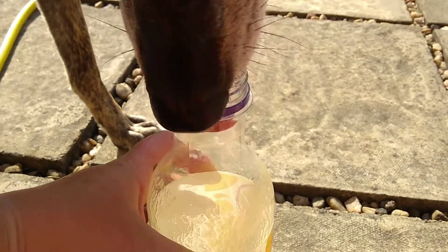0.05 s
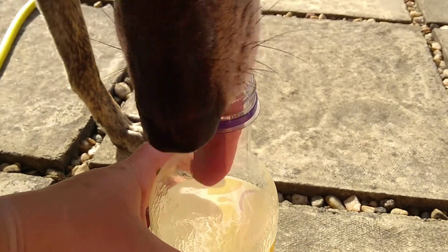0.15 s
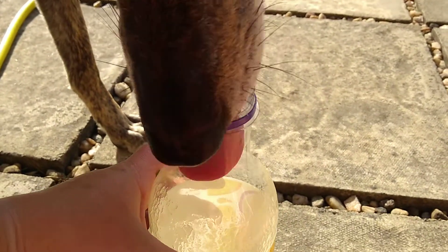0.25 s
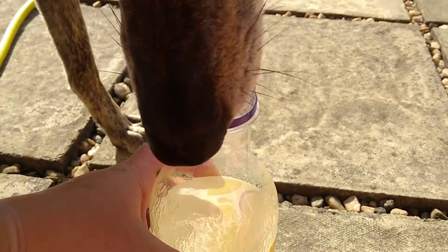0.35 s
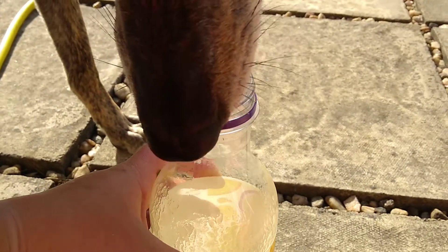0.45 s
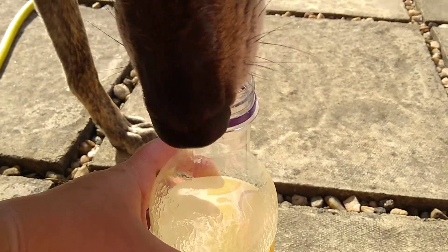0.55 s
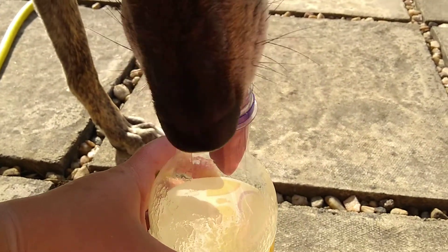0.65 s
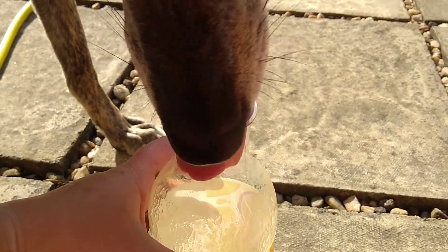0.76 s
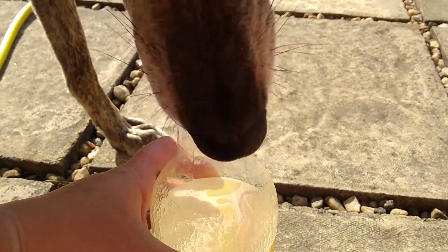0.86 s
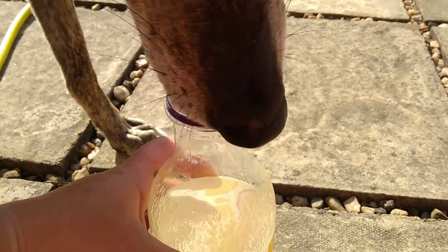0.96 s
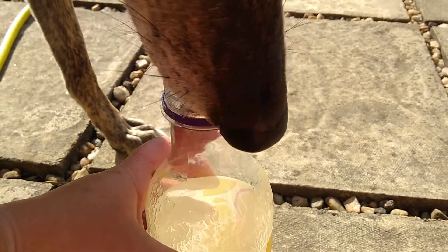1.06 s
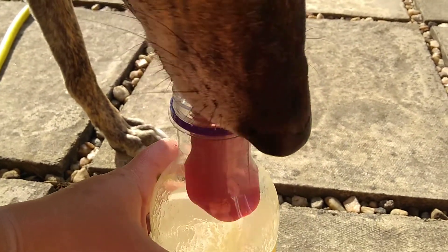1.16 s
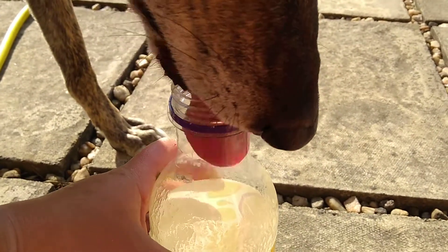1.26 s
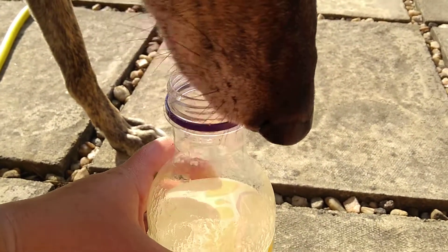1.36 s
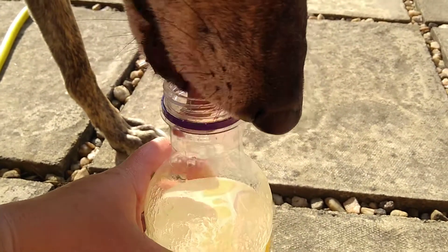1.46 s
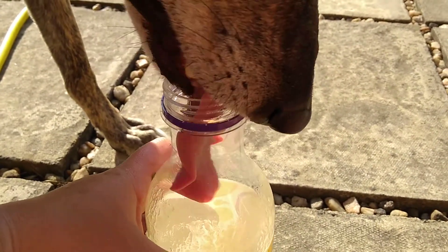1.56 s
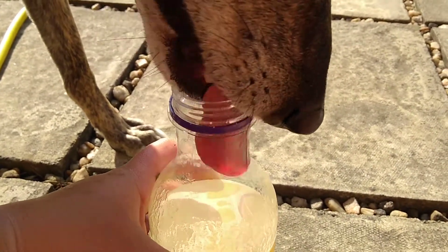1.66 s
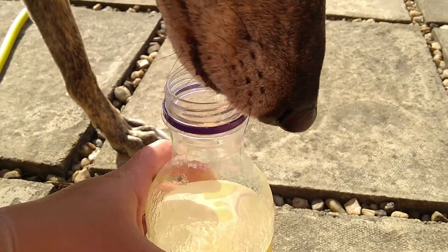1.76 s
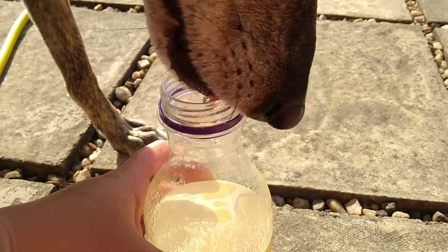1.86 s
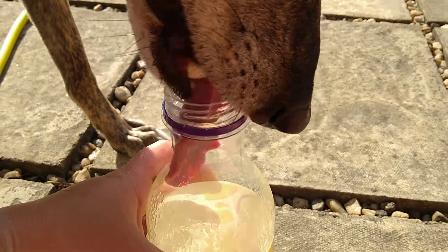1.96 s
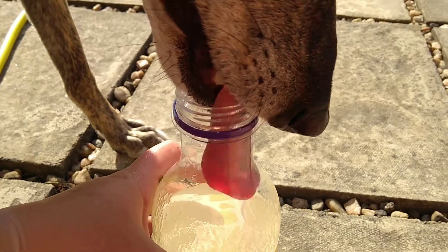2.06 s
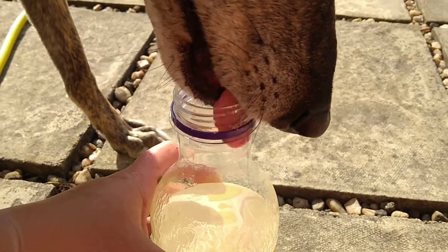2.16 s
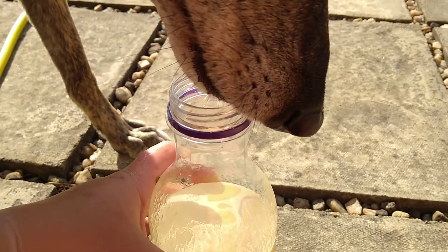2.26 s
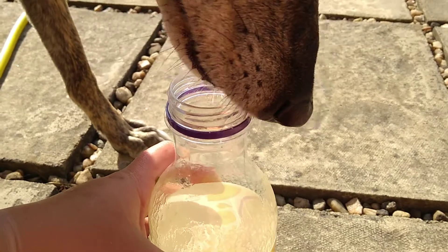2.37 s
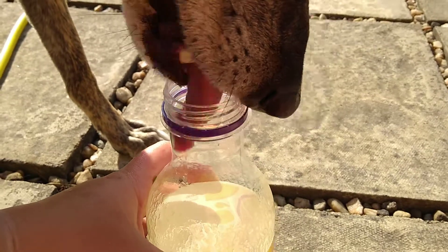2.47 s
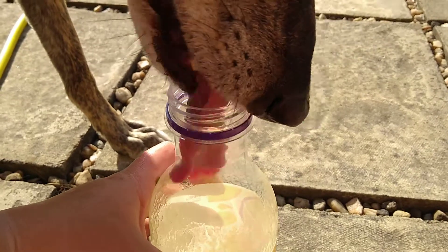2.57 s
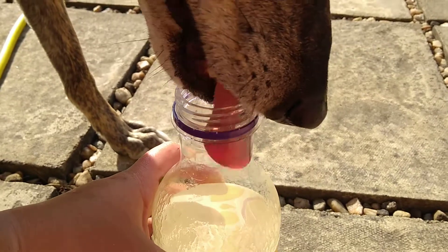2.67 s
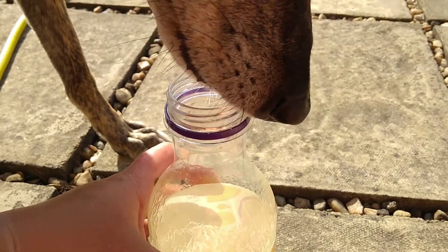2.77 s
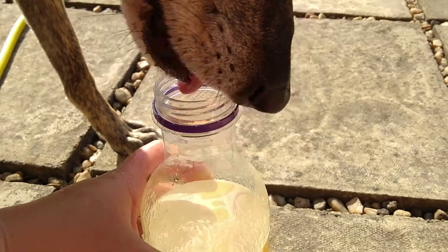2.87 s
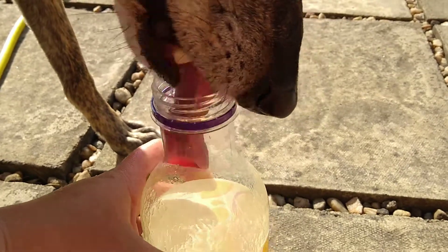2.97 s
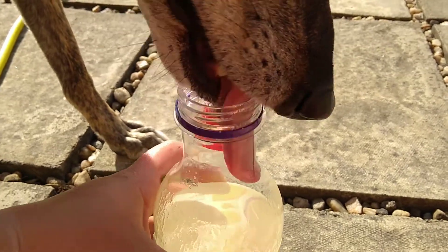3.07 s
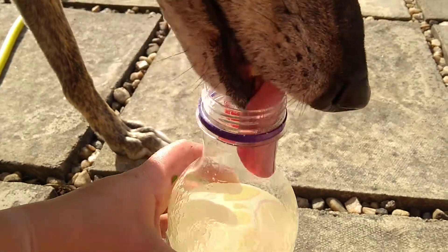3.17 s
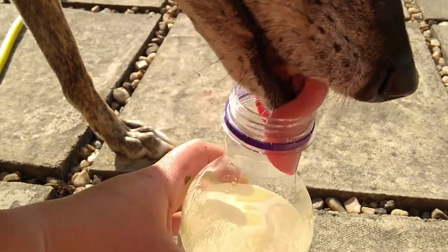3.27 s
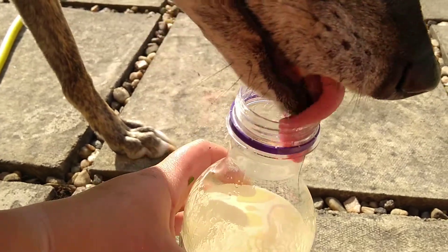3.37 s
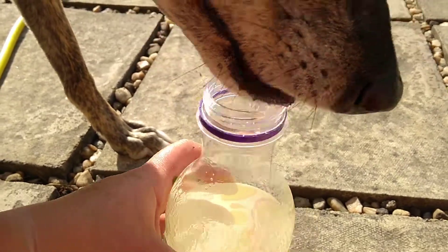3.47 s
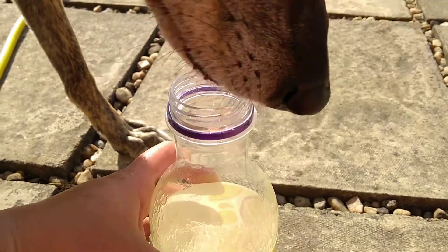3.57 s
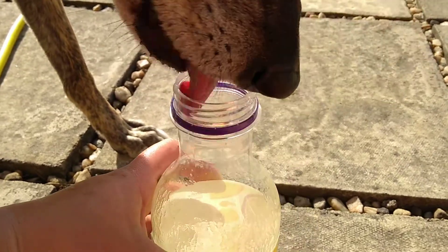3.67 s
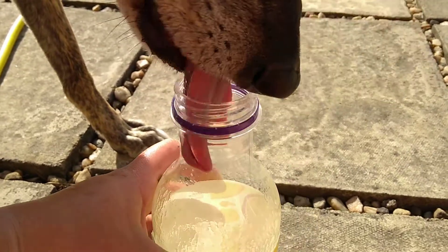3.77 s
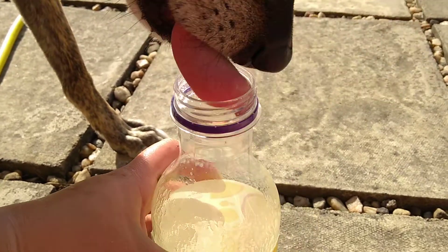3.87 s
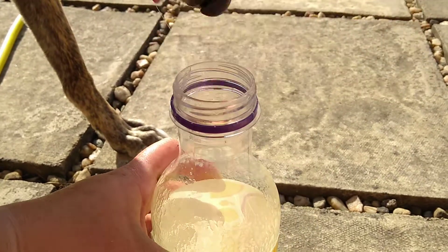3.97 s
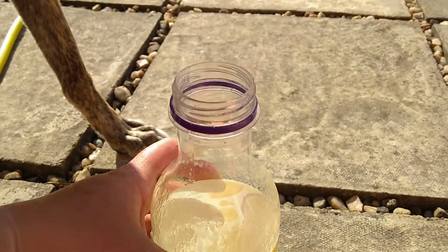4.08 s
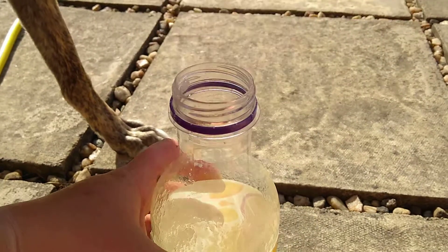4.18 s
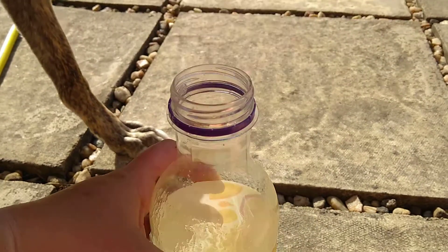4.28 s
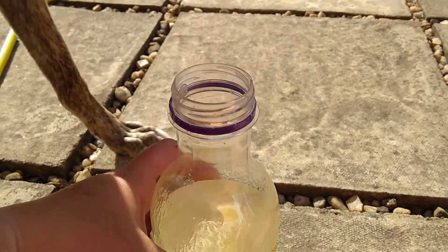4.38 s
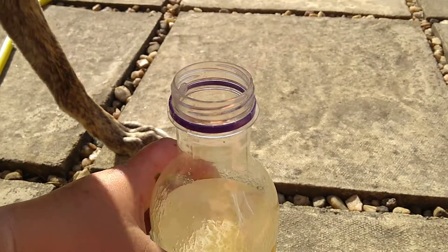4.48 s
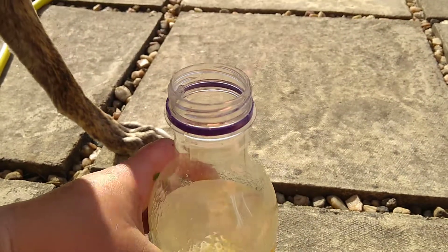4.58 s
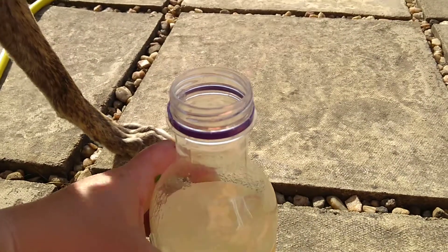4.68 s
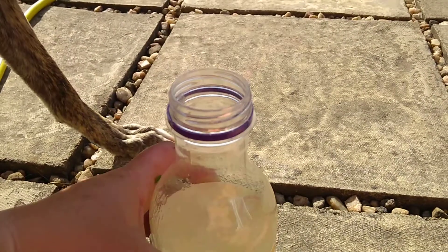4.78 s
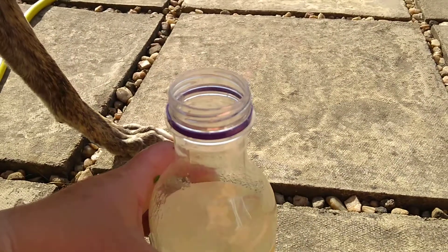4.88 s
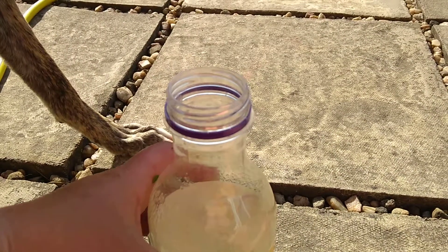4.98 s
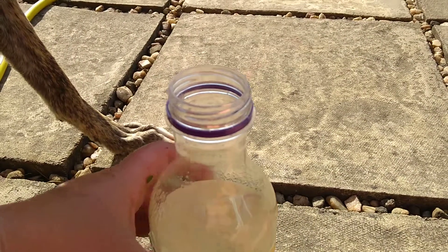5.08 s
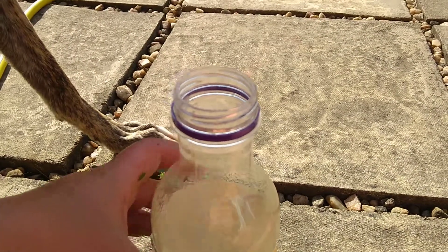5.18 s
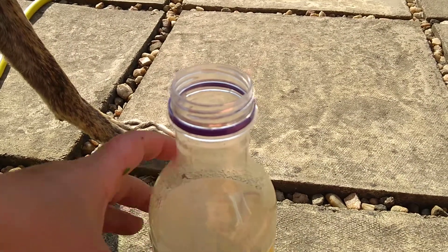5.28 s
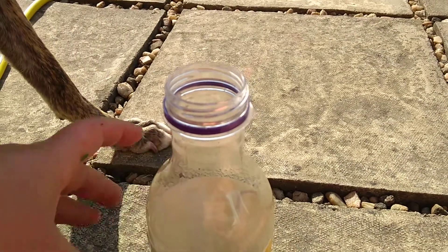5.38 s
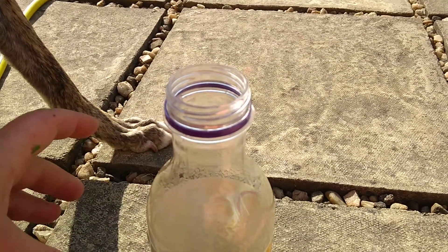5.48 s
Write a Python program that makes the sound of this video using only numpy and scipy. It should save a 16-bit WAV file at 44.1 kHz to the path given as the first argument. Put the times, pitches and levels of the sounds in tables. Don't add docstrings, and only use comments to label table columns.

```python
import sys
import numpy as np
from scipy import signal
from scipy.fft import rfft, irfft, next_fast_len
from scipy.io import wavfile
from scipy.ndimage import uniform_filter1d, minimum_filter1d

SR = 44100
rng = np.random.default_rng(int(sys.argv[2]) if len(sys.argv) > 2 else 0)


def generate_wav(sig):
    pcm = np.round(np.clip(np.atleast_2d(sig).T, -1, 1) * 32767).astype(np.int16)
    wavfile.write(sys.argv[1], SR, pcm)


def decibels_to_gain(level_db):
    exponent = np.asarray(level_db, float) / 20
    return 10 ** exponent


N = 243873

# peak_s, pressure_db, hollow_rub_over_it_db, hiss_over_it_db
STROKES = [(0.0, -43, 2.5, -6.5), (0.28, -44, -6, -3), (0.538, -47, -3.5, -9.5), (0.803, -45, -17.5, -6),
           (1.058, -42.5, -7.5, -32.5), (1.24, -51, -41, -5), (1.45, -51.5, 1, -8), (1.72, -47, -3, -6),
           (1.958, -46, -5, -2.5), (2.201, -45, -34, -3), (2.46, -55.5, -2, 0.5), (2.776, -48, -1.5, -3),
           (2.92, -70.5, 16.5, 17), (3.168, -56, -3, 0.5), (3.508, -47.5, -18.5, -4), (3.63, -58, 9, -30),
           (3.92, -62, -5.5, -11), (4.16, -59.5, 10.5, 2.5), (4.56, -75.5, 2, 22.5), (4.71, -73, 20, 7.5),
           (0.11, -50, -3, -9), (0.68, -61.5, -9.5, -20), (0.9, -52, -10.5, -11.5), (1.35, -48.5, -9, -5.5),
           (1.67, -48.5, -4.5, -7.5), (1.855, -44.5, -3.5, -7), (2.1, -49, -9, -6.5),
           (2.385, -51.5, -2.5, -6), (2.681, -49.5, -6, -6), (5.481, -63, 9.5, 20.5)]
PRESS_SPEED = [91, 159, 130]
EASE_SPEED = [84, 135, 125]
# pitch_hz, width_hz, level_db
NECK = [(2650, 860, 11.5), (3470, 1130, 9), (3750, 490, 12.5)]
# pitch_hz, width_hz, level_db
HOLLOW = [(654, 1280, 0.5), (1150, 472, 6.5), (1800, 5500, -22)]
# pitch_hz, level_db
HISS = [(2500, -34), (4500, -3), (6000, -2), (9000, -3), (12000, -8.5), (14500, -10.5), (15500, -41.5)]

# time_s, level_db
WIND = [(0.0, -36.5), (0.57, -45), (1.0, -41.5), (1.22, -43.5), (1.35, -46), (1.72, -47), (1.99, -41),
        (2.31, -44.5), (2.66, -46.5), (2.93, -49), (3.33, -44.5), (3.62, -38), (4.02, -40.5), (4.24, -39),
        (4.48, -43.5), (4.85, -38), (5.17, -37.5), (5.53, -38.5)]
# pitch_hz, level_db_per_hz
WIND_COLOUR = [(20, -43.5), (70, -37), (120, -6), (180, -1.5), (300, 0), (420, -12), (560, -29),
               (800, -43.5), (1500, -85.5)]
# pitch_hz, level_db_per_hz
BUFFET = [(20, -30), (55, -22), (95, 3.5), (140, -11.5), (300, -52.5)]
# pitch_hz, level_db_per_hz
AIR = [(300, -27.5), (600, -8), (2000, -2), (4000, -3.5), (6000, -13.5), (10000, -16), (14000, -27),
       (15500, -68.5)]

# start_s, peak_db, bright_hz, hollow_db, fizz_db
SNAPS = [(0.07, -28, 2400, 9, -15), (0.447, -4, 3670, -17.5, -13.5), (0.464, -13.5, 3340, -4, -29.5),
         (0.775, -3, 3340, -14.5, -9), (0.952, -28.5, 4040, -7.5, -3), (1, -23.5, 2270, -4.5, -1.5),
         (1.836, -14, 3970, -8.5, -3), (2.082, -8, 3140, -12, -7), (2.321, -7.5, 3640, -13.5, -32),
         (2.555, -22.5, 3480, -23.5, -5.5), (2.659, -7.5, 3290, -11, -11.5), (3.087, -25.5, 3800, 1, -6),
         (4.086, -30.5, 3600, 7.5, 7)]
# start_s, peak_db, bright_hz, hollow_db, fizz_db
CRACKS = [(0.242, -4.5, 3140, -12.5, -7), (1.212, -2, 2500, -6.5, -9.5), (1.33, -11.5, 2620, -16, -7.5),
          (1.653, -4, 3750, -8.5, -28), (1.825, -12, 3520, -11.5, -27), (2.001, -17, 3900, -32, 1),
          (2.278, -10, 3850, -15.5, -6), (2.363, -5, 4160, -10, -1), (4.147, -12, 3480, -12.5, -19),
          (5.369, -39.5, 2070, -5, -15.5), (1.078, -13, 4050, -24, -38), (3.484, -23, 3350, -24, -23),
          (2.3, -18.5, 3390, -2, -1)]
# start_s, peak_db, bright_hz, hollow_db
TICKS = [(0.519, -38, 4700, -4), (1.646, -31, 4400, 1), (1.233, -24, 3600, -19.5),
         (1.289, -31.5, 4500, -16), (1.529, -25, 3860, -18.5), (1.583, -23, 5200, -41),
         (2.651, -30.5, 4300, -7), (1.958, -32.5, 3620, -9), (2.14, -26.5, 3700, -9.5),
         (2.537, -33, 3600, -39), (2.896, -27.5, 3570, -4), (3.835, -24, 3450, -30),
         (4.111, -40.5, 3100, -13.5), (4.197, -33.5, 3000, -14), (5.149, -37, 2790, -13),
         (4.7, -44.5, 2860, -4.5), (5.003, -41.5, 3450, -12), (0.384, -37, 4300, -29.5),
         (3.409, -35, 3600, -34), (4.88, -54, 2500, -22), (1.056, -40, 3700, -15),
         (1.779, -30.5, 2900, -22), (2.21, -36, 4000, -31), (2.24, -36, 5600, -21), (2.762, -36, 3900, -25),
         (1.831, -18.5, 4300, -11), (1.976, -36, 6700, -30), (1.3, -40, 4300, -32), (2, -31, 5600, -17.5),
         (0.95, -38, 4400, -17), (0.9, -40, 3700, -11)]
# start_s, peak_db, pocket_hz, bright_db
POPS = [(0.205, -16, 1000, -20), (0.721, -45, 1150, -5), (0.863, -32.5, 1100, 0), (1.093, -36, 760, -1),
        (1.183, -21, 1050, -14), (1.46, -30, 1100, -7), (1.883, -25.5, 860, -12), (2.066, -26.5, 1100, 1.5),
        (2.058, -30, 1008, -10.5), (1.646, -21.5, 1200, -5.5), (2.518, -33, 1100, -20),
        (2.63, -38, 1100, 1.5), (2.868, -37, 950, -14), (3.606, -23.5, 1000, -2.5),
        (4.068, -41, 950, -28.5), (4.762, -39.5, 1060, -26), (3.418, -31, 520, -25), (3.432, -36, 700, -25),
        (3.444, -31.5, 600, -12), (3.452, -39, 794, -20), (3.535, -38.5, 480, -20),
        (3.621, -24.5, 1040, -10), (4.24, -43, 1000, -17), (4.682, -37, 1150, -25),
        (4.985, -48, 1050, -23.5), (5.017, -33, 1076, -27), (5.153, -46, 1100, -21),
        (5.174, -52, 1100, -24.5), (0.43, -36, 420, -31), (1.29, -33, 450, -15), (0.204, -24, 600, -30),
        (2.142, -28, 420, -30), (4.81, -48, 1050, -30), (5.11, -50, 1750, -30)]
# start_s, peak_db, bright_hz,
# bright_db
SPITS = [(0.051, -32.5, 8200, 0.5), (0.418, -36, 8300, 0), (1.47, -34.5, 3900, 3), (1.879, -30.5, 1700, -1),
         (0.063, -35, 8300, 2), (2.073, -32, 5500, -1.5), (1.6, -40, 13000, 4), (1, -40.5, 5500, -1),
         (2.78, -28, 3700, 0), (2.879, -30, 1860, -3.5), (2.891, -26, 4250, -1), (2.918, -37, 3500, -1),
         (2.947, -35, 3680, -3.5), (3.875, -36, 3100, 1), (3.968, -45.5, 9100, 11), (4.526, -39.5, 5200, 0),
         (4.547, -27, 5600, 0.5), (4.57, -27, 6100, -0.5), (5.129, -44, 4000, 2), (1.2125, -15.5, 5900, 7),
         (0.242, -14.5, 8200, 1.5), (2.363, -20.5, 5700, 9), (3.522, -33.5, 6700, -3),
         (3.549, -42, 6500, 3), (4.236, -39.5, 8800, 3), (3.828, -42, 7500, 2), (3.113, -37, 7400, -3),
         (3.178, -49, 5700, -2), (4.648, -48, 8500, 5), (2.142, -32, 5600, 3)]
TEAR_MS = [1.5, 0.909, 0.5, 0.5, 0.33]
# pitch_hz, level_db
FIZZ = [(2500, -61), (4200, -10.5), (5000, -12), (6000, -15), (7000, -7.5), (8500, -13), (11000, -18.5),
        (14000, -20.5), (15500, -27), (16500, -25)]

# pitch_hz, fade_by_60_db_s
YARD_FADE = [(200, 0.46), (1000, 0.11), (4000, 0.057), (12000, 0.12)]
# pitch_hz, level_db
YARD_COLOUR = [(1500, 1.5), (4000, -3), (7000, -6), (12000, -12.5)]

# start_s, peak_db, pitch_hz, fade_by_60_db_s, wall_slap_db
THUMPS = [(.068, -22, 354, 0.016, 11.5), (0.447, -30, 202.6, 0.37, 22.5), (0.863, -22.5, 360, 0.041, -3),
          (1.2075, -15.5, 167, 0.041, 10), (1.583, -16, 330, 0.034, 3.5), (1.654, -29.5, 148, 0.12, 17.5),
          (1.835, -18, 201.7, 0.24, 13), (2.002, -17.5, 336, 0.012, 2), (2.082, -25, 243, 0.058, 16.5),
          (2.279, -31.5, 196.5, 0.5, 17), (2.322, -19.5, 196.5, 0.36, 18),
          (2.365, -20.5, 195.5, 0.29, 21.5), (2.663, -24.5, 159, 0.16, 4.5), (3.088, -26, 148, 0.2, -51),
          (3.611, -23.5, 200.5, 0.3, -4.5), (5.45, -29, 201.5, 0.22, -10.5)]

# start_s, length_s, pitch_hz, level_db
SLURPS = [(0.09, 0.045, 4500, -46), (1.3, 0.036, 2530, -43), (2.52, 0.03, 3800, -43),
          (2.191, 0.083, 3730, -35), (2.439, 0.05, 3700, -47.5), (3.42, 0.14, 3560, -36),
          (3.44, 0.13, 2596, -40), (5.16, 0.11, 585, -51.5), (4.59, 0.085, 580, -56),
          (5.442, 0.14, 3360, -47.5), (3.87, 0.18, 8700, -58), (2.755, 0.04, 3800, -46),
          (3.92, 0.1, 3700, -51), (3.875, 0.035, 3300, -47), (4.875, 0.03, 2900, -57)]
# start_s, length_s, pitch_hz, level_db
GULPS = [(3.411, 0.064, 345, -31.5), (3.547, 0.025, 1180, -43), (3.605, 0.039, 1010, -30),
         (4.675, 0.065, 893, -45.5), (4.679, 0.079, 1174, -48.5), (5.02, 0.07, 1072, -50),
         (0.379, 0.062, 3750, -40), (3.905, 0.08, 3450, -47), (4.231, 0.075, 10000, -52.5),
         (5.459, 0.041, 995, -47), (2.63, 0.025, 1100, -42), (5.0, 0.05, 3550, -55)]
# start_s, length_s, pitch_hz, level_db
SMEARS = [(1.837, 0.095, 685, -36), (2.877, 0.028, 1020, -34.5), (2.91, 0.11, 3380, -50),
          (3.087, 0.068, 2700, -39), (3.409, 0.16, 628, -37.5), (4.147, 0.15, 3580, -47),
          (4.541, 0.072, 7550, -44.5), (4.09, 0.068, 6500, -52), (4.233, 0.065, 8800, -52.5),
          (4.476, 0.019, 5750, -48), (4.534, 0.098, 4300, -46), (4.991, 0.076, 2900, -60),
          (2.531, 0.016, 4830, -38.5), (3.09, 0.075, 8000, -47), (2.873, 0.04, 6000, -43),
          (2.878, 0.035, 1700, -43), (0.245, 0.09, 7000, -48), (3.832, 0.06, 3300, -46),
          (1.0, 0.1, 5500, -52), (1.335, 0.05, 5500, -47), (4.08, 0.06, 650, -43), (1.54, 0.02, 2900, -48),
          (5.29, 0.03, 7800, -55), (0.78, 0.09, 1100, -45), (0.25, 0.07, 1200, -45)]
# start_s, length_s, pitch_hz, level_db
RUSTLES = [
    (3.431, 0.116, 8600, -43.5),
    (3.883, 0.18, 11000, -52),
    (5.408, 0.1, 6000, -43),
]
# start_s, length_s, pitch_hz, level_db
WHISTLES = [(0.61, 0.022, 1150, -51), (0.715, 0.018, 1150, -46), (3.272, 0.074, 6200, -56),
            (3.622, 0.14, 1006, -57), (3.928, 0.078, 1128, -44.5), (4.693, 0.1, 2725, -57.5),
            (5.148, 0.094, 2800, -60), (3.287, 0.25, 3590, -44.5), (3.254, 0.27, 10840, -59),
            (3.3, 0.12, 10200, -65), (3.392, 0.075, 5670, -54.5), (2.825, 0.05, 780, -53),
            (0.53, 0.016, 1150, -52)]
SWELL_KINDS = [(0.167, 0.43), (0.12, 0.053), (0.57, 0.16), (0.73, 0.73), (0.055, 0.45)]

# pitch_hz, turn_radians
CHANNEL_TURN = [(60, -3), (120, -2), (300, 0), (1280, 0), (1750, -1), (2000, -2.9), (2480, -3.4), (2850, -4.3),
                (3100, -5.8), (3900, -7.6), (4350, -8.9), (4600, -9.8), (4900, -10.5), (5400, -12.9),
                (6100, -13.2), (6600, -10.6), (7500, -9.5), (8300, -7.5)]
# pitch_hz, level_db
CHANNEL_DB = [(60, 2), (130, 1.5), (290, 2), (640, 0.5), (1410, 0.5), (3100, 2.5), (6820, -5.5), (15000, -1)]
# pitch_hz, level_db
OVERALL_TONE = [(20, -2), (70, 0.5), (13000, -3.5), (13600, -12), (14100, -2), (14800, -3), (15600, -16),
                (16600, -26)]
# pitch_hz, share
SKIPPED = [(4000, 0), (7000, .04), (9500, .07), (11500, .15), (13000, .25), (13600, .5), (14200, .3),
           (15000, .6)]
# pitch_hz, share
CANCELLED = [(1980, 0), (2080, .8), (2330, .8), (2430, 0), (4350, 0), (4450, .3), (4800, .3), (4950, 0)]

SLIDE_SAME = 0.87


def read(points, hz):
    f, value = np.transpose(points)
    return np.interp(np.log(hz + 1), np.log(f + 1), value)


def evened(x):
    return x / np.sqrt(np.mean(x ** 2) + 1e-20)


def peaked(x):
    return x / abs(x).max()


def add(mix, s, sound):
    part = mix[round(s * SR):][:len(sound)]
    part += sound[:len(part)]


def ring(x, hz, width):
    return signal.lfilter(*signal.iirpeak(hz, hz / width, SR), x)


def double_ring(x, hz, first_width, second_width):
    return ring(ring(x, hz, first_width), hz, second_width)


def body(x, modes):
    return sum((-1) ** k * decibels_to_gain(db) * ring(x, hz, width) for k, (hz, width, db) in enumerate(modes))


def colour(x, points):
    log_gain = np.log(decibels_to_gain(read(points, np.fft.rfftfreq(2048, 1 / SR))))
    circle = np.r_[log_gain, log_gain[-2:0:-1]]
    taps = np.fft.ifft(np.exp(np.conj(signal.hilbert(circle)))).real[:1024]
    taps = taps.reshape((1,) * (x.ndim - 1) + (-1,))
    return signal.oaconvolve(x, taps, axes=-1)[..., :x.shape[-1]]


def likened(a, b, same):
    return np.array([a, same * a + np.sqrt(1 - same ** 2) * b])


def pair(same):
    return likened(*rng.standard_normal((2, N)), same)


def wobble(hz):
    smooth = signal.butter(N=2, Wn=hz, fs=SR, output="sos")
    return evened(signal.sosfilt(smooth, rng.standard_normal(N)))


def patchy(x, patch_db):
    z = signal.stft(x, nperseg=512)[2]
    field = rng.standard_normal(z.shape[1:])
    field = evened(uniform_filter1d(uniform_filter1d(field, size=2, axis=0), size=7, axis=1))
    return evened(signal.istft(z * decibels_to_gain(patch_db * field), nperseg=512)[1][:, :N])


def contact(over_db, press_db_per_s, ease_db_per_s):
    s, db = np.transpose(STROKES)[:2, :, None]
    t = np.arange(0, N + 64, 64) / SR
    away_db = np.maximum(press_db_per_s * (s - t), ease_db_per_s * (t - s))
    level_db = db + np.reshape(over_db, (-1, 1)) - away_db
    return np.interp(np.arange(N) / SR, t, np.sqrt((decibels_to_gain(level_db) ** 2).sum(0)))


def slide():
    layers = zip((0, *np.transpose(STROKES)[2:]), PRESS_SPEED, EASE_SPEED)
    neck, hollow, hiss = (contact(*layer) for layer in layers)
    bubbles = decibels_to_gain(6.55 * np.minimum(rng.exponential(1, (3, N)), 3)) * (rng.random((3, N)) < 120 / SR)
    bubbles = signal.oaconvolve(bubbles, signal.windows.hann(250)[None], axes=1)[:, :N]
    bursts = 1 + np.array([[0.07], [0.15], [0.035]]) * bubbles
    squeak = patchy(body(bursts[0] * pair(SLIDE_SAME), NECK), patch_db=1.5)
    rub = patchy(body(body(bursts[1] * pair(SLIDE_SAME), HOLLOW), HOLLOW), patch_db=8.5)
    spray = patchy(colour(bursts[2] * pair(0.5), HISS), patch_db=5)
    wet = decibels_to_gain(1.0 + 2.2 * wobble(hz=9.0))
    return neck * squeak + hollow * rub + wet * hiss * spray


def wind():
    t = np.arange(N) / SR
    db = np.interp(t, *np.transpose(WIND))
    gusts = decibels_to_gain(db + 1.9 * wobble(hz=26.7) + 1.2 * wobble(hz=4.0))
    rumble = patchy(colour(pair(0.14), WIND_COLOUR), patch_db=2.0)
    deep_db = -13 - 0.44 * (db - db.mean()) + 1.5 * t
    deep = decibels_to_gain(deep_db + 2.0) * evened(colour(pair(0.84), BUFFET))
    roar_db = -23 + 1.2 * (db - db.max())
    roar = decibels_to_gain(roar_db) * evened(double_ring(pair(0.5), 520, 220, 220))
    air = decibels_to_gain(-67.5) * patchy(colour(pair(0.97), AIR), patch_db=2.0)
    return gusts * (rumble + deep + roar) + air


def tears():
    wide = 1100, 1813
    rim_hz = 3460
    snap, crack, tick, pop, spit = TEAR_MS
    rows = []
    for tear_ms, table in ((snap, SNAPS), (crack, CRACKS)):
        rows += [(s, tear_ms, db, hz, db + low, *wide, db + fizz) for s, db, hz, low, fizz in table]
    rows += [(s, tick, db, hz, db + low, *wide, db - 28) for s, db, hz, low in TICKS]
    rows += [(s, pop, db + top, rim_hz, db, hz, 220, db - 28) for s, db, hz, top in POPS]
    rows += [(s, spit, db + top, hz, db - 24, *wide, db) for s, db, hz, top in SPITS]
    return rows


def snaps():
    out, lead = np.zeros((2, N)), 0.008
    late = np.arange(2400) / SR - lead
    threads = np.where(late < 0, 0.02 * np.exp(late / 0.0062), 0.054 * np.exp(-late / 0.0017))
    for s, tear_ms, db, hz, hollow_db, pocket_hz, width, fizz_db in tears():
        ms = tear_ms - 0.035 * max(db, hollow_db, fizz_db)
        ms = max(ms, 0.2)
        u = np.maximum(late, 0) * 1000 / ms
        shape = u * np.exp(-u) + threads
        grit = rng.standard_normal((3, len(late)))
        grit += 9 / ms * (abs(u - 1) == abs(u - 1).min())
        tear, sides = grit[0] * shape, grit[1:] * shape

        neck = 0.071 * body(body(tear, NECK), NECK)
        bright = decibels_to_gain(db + 2.0) * peaked(double_ring(tear, hz, 750, 2800) + neck)
        hollow = decibels_to_gain(hollow_db) * peaked(double_ring(body(tear, HOLLOW), pocket_hz, width, 2 * width))
        fizz = decibels_to_gain(fizz_db) * peaked(colour(tear + 1.58 * sides, FIZZ))
        scatter = ring(sides, hz=2018, width=1020) + 0.5 * ring(sides, hz=4700, width=900)
        scatter = decibels_to_gain(db - 15.0) * peaked(scatter)
        for side in range(2):
            add(out[side], s - lead, bright + hollow + fizz[side] + scatter[side])
    return out


def yard(x):
    hz, t, z = signal.stft(pair(0.55)[:, :SR // 2], SR, nperseg=128)
    level_db = read(YARD_COLOUR, hz)[:, None] - 60 * t / read(YARD_FADE, hz)[:, None]
    tail = signal.istft(z * decibels_to_gain(level_db), SR, nperseg=128)[1]
    tail *= 1 + 3.0 * np.exp(-np.arange(tail.shape[1]) / SR / 0.006)
    tail[:, :100] = 0
    return signal.fftconvolve(x[None], tail / np.linalg.norm(tail[0]), axes=1)[:, :N]


def thumps():
    out, t = np.zeros((2, N)), np.arange(SR // 3) / SR
    for s, db, hz, fade_s, slap_db in THUMPS:
        air = decibels_to_gain(-60 * t / max(fade_s, 0.02)) * np.sin(2 * np.pi * hz * t)
        air *= 1 - np.exp(-t / 0.0039)
        wall = np.sin(2 * np.pi * 310 * t) + 0.54 * np.sin(2 * np.pi * 560 * t)
        slap = decibels_to_gain(slap_db - 60 * t / 0.022) * wall * (1 - np.exp(-t / 0.0037))
        for side, sign in enumerate((-1, 1)):
            both = decibels_to_gain(sign * 3.5) * air + decibels_to_gain(-sign * 0.7) * slap
            add(out[side], s + 0.0014, decibels_to_gain(db) * both)
    return out


def swells():
    out = np.zeros((2, N))
    tables = SLURPS, GULPS, SMEARS, RUSTLES, WHISTLES
    for rows, (share, rising) in zip(tables, SWELL_KINDS):
        for s, length, hz, db in rows:
            u, width = np.linspace(0, 1, round(length * SR)), 1.02 * share * hz
            a, b, flutter = rng.standard_normal((3, len(u)))
            noise = likened(a, b, SLIDE_SAME)
            noise *= decibels_to_gain(3.1 * evened(uniform_filter1d(flutter, size=200)))
            shape = np.interp(u, [0, np.clip(rising, 0.02, 0.95), 1], [0, 1, 0]) ** 0.82
            sound = decibels_to_gain(db) * shape * evened(double_ring(noise, hz, width, width))
            for side in range(2):
                add(out[side], s, sound[side])
    return out


def scene():
    clicks = snaps()
    return slide() + wind() + clicks + decibels_to_gain(-12) * yard(clicks.mean(0)) + thumps() + swells()


def squelch(x, near_db, far_db):
    hz, _, z = signal.stft(np.array([x[0] + x[1], x[0] - x[1]]) / 2, SR, nperseg=1024)
    upper = (hz > 950)[:, None]
    power = uniform_filter1d(uniform_filter1d(abs(z) ** 2, size=5, axis=1), size=2, axis=2) * upper
    neighbours = -minimum_filter1d(-power.max(0), size=11, axis=0) / decibels_to_gain(2 * near_db)
    whole = -minimum_filter1d(-power[:, hz > 1500].max((0, 1)), size=3) / decibels_to_gain(2 * far_db)
    under_db = 10 * np.log10((np.maximum(neighbours, whole) + 1e-20) / (power + 1e-20))
    keep = decibels_to_gain(-np.clip(8 * under_db, 0, 30) * upper)

    treble = (abs(z) ** 2 * upper).sum((0, 1))
    sudden = treble > 1.9 * uniform_filter1d(treble, size=7)
    keep[:, (hz[:, None] < 3000) & sudden] = 1

    luck = rng.random((2, len(hz) // 12 + 1, z.shape[2] // 5 + 1))
    luck = luck.repeat(12, axis=1).repeat(5, axis=2)[:, :len(hz), :z.shape[2]]
    after = np.roll(sudden, 1) & ~sudden
    skipped = luck < read(SKIPPED, hz)[:, None] * (1 + 2 * after)
    keep[skipped & ~sudden] = 0.03
    cancelled = luck[1] < read(CANCELLED, hz)[:, None]
    keep[0][cancelled & ~sudden] = 0.03
    mid, side = signal.istft(z * keep, SR, nperseg=1024)[1][:, :N]
    return np.array([mid + side, mid - side])


def low_pass(x):
    return signal.sosfilt(signal.butter(12, 16500, fs=SR, output="sos"), x)


def record(dry):
    size = next_fast_len(N + 4096)
    hz = np.fft.rfftfreq(size, 1 / SR)
    half = np.exp(0.5j * read(CHANNEL_TURN, hz)) / decibels_to_gain(0.5 * read(CHANNEL_DB, hz))
    tone = decibels_to_gain(read(OVERALL_TONE, hz)) * np.array([1 / half, half])
    channels = irfft(rfft(dry, size) * tone, size)[:, :N]
    mix = np.clip(squelch(channels, near_db=12, far_db=44.5), -0.99, 0.99)
    return low_pass(mix)


dry = scene()
out = record(dry)
generate_wav(out)
```